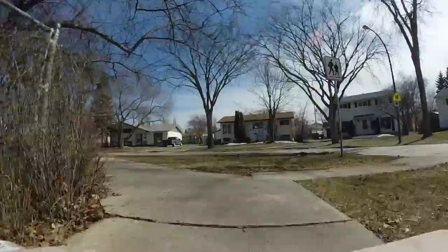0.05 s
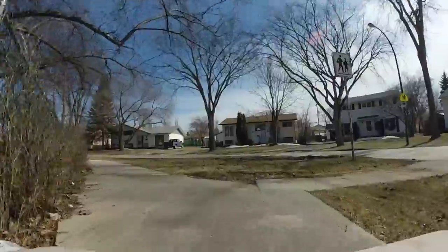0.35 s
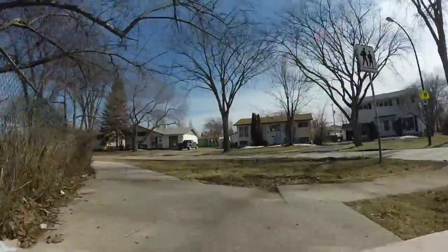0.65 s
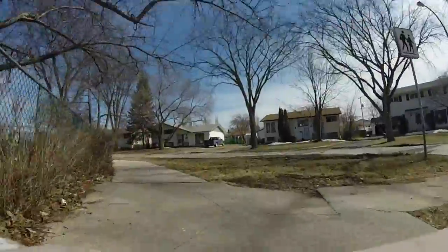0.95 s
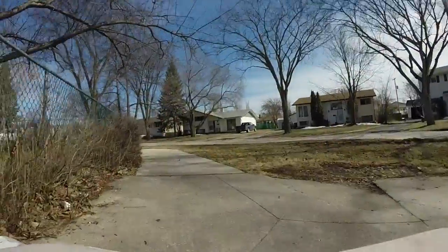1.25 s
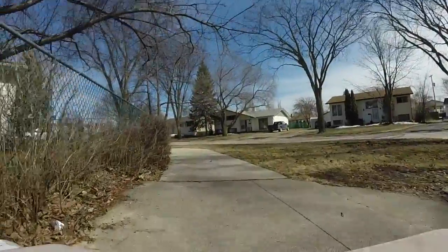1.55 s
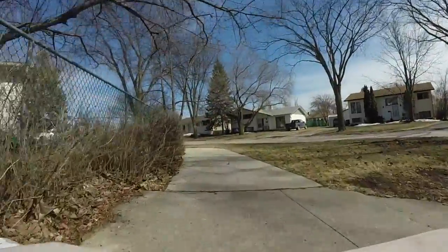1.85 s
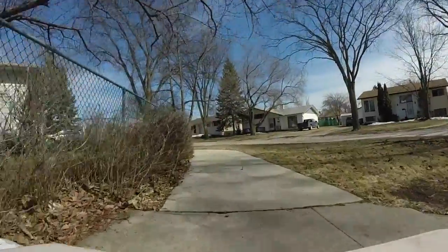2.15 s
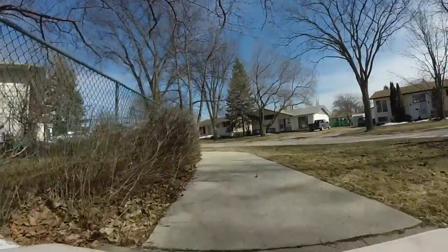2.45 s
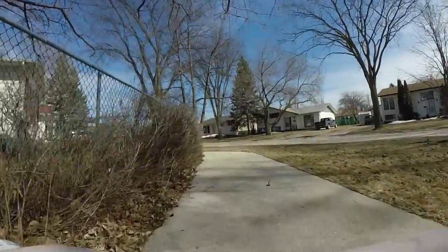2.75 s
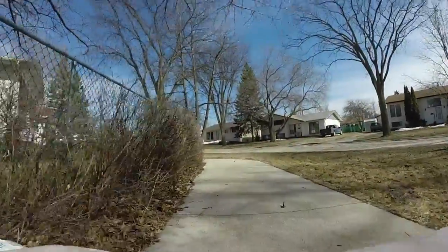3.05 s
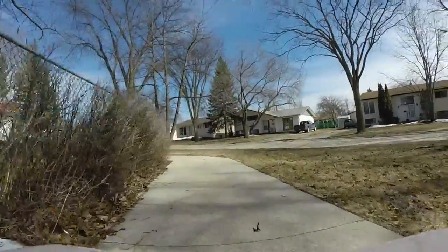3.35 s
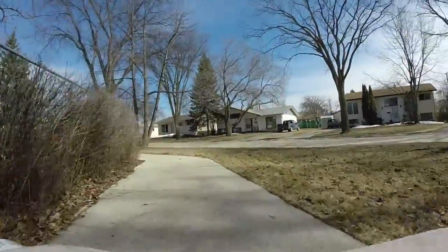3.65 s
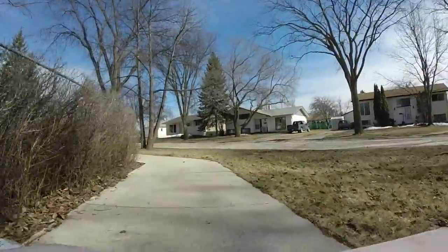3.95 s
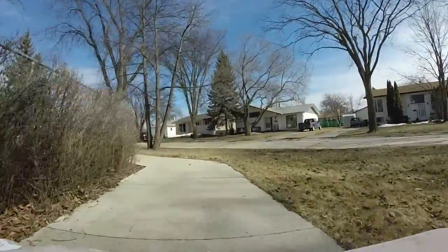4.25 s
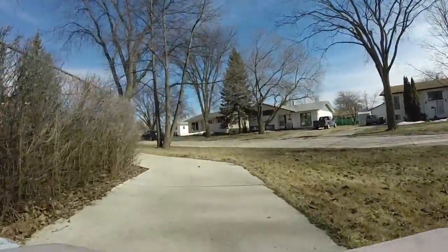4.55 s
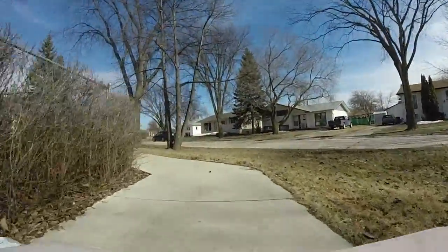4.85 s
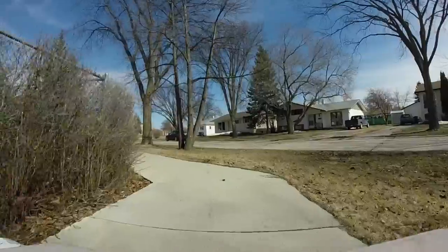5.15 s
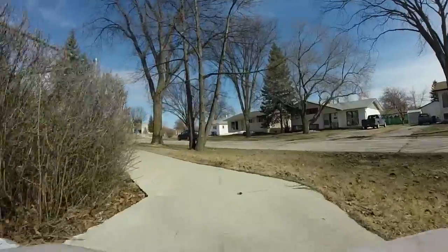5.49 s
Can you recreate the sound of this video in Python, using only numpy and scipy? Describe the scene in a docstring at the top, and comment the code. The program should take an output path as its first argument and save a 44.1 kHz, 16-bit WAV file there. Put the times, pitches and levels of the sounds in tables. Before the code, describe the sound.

A ride-on toy car rolls along concrete, its hard plastic wheels clattering and hollow body rumbling, with wind buffeting the microphone.

```python
"""Toy car on a sidewalk

A battery ride-on toy car rolls over rough concrete, heard from a small camera fixed to its body.
Its hard wheels make loose plastic parts clatter and the hollow shell boom, a little more once a turn.
After a bump the car goes light and the rattle eases. Sand hisses and grit crackles under the treads,
the axle rings faintly, the gears whine and wind buffets the microphone."""
import sys
import numpy as np
from scipy import signal
from scipy.fft import rfft, irfft, next_fast_len
from scipy.io import wavfile
from scipy.ndimage import uniform_filter1d

SR = 44100
rng = np.random.default_rng(int(sys.argv[2]) if len(sys.argv) > 2 else 0)


def wav_out(sig):
    """Save sig, one row per channel (or a flat mono array), as 16-bit PCM at SR to the path in sys.argv[1]."""
    wavfile.write(sys.argv[1], SR, np.round(np.clip(np.atleast_2d(sig).T, -1, 1) * 32767).astype(np.int16))


N = 243431
TIME = np.arange(N) / SR

# Loud knocks of loose plastic parts. Each row: start in seconds, level of the clack in dB,
# then its low thud and its bright edge, both in dB compared with the clack.
LOUD_KNOCKS = [(0.019, -12.5, -2.5, -15.5), (0.0316, -22, 3.5, -14.5), (0.043, -17.5, -4.5, -26),
               (0.07, -20, -7, -19), (0.099, -23, -2, -16), (0.1223, -25.5, -1, -10),
               (0.148, -23.5, 1, -10), (0.1706, -24.5, -3, -12.5), (0.21, -29.5, 1, -19.5),
               (0.2322, -25.5, -6, -15), (0.2544, -22.5, -11, -26), (0.2732, -28.5, -12.5, -20.5),
               (0.3131, -29.5, 4, -20), (0.361, -31, 3.5, -20), (0.394, -26, 3, -26),
               (0.436, -21, -3.5, -16.5), (0.4599, -26.5, -8.5, -25), (0.636, -19, -9, -15.5),
               (0.6565, -27, 1, -20), (0.669, -25, -3, -14), (0.7234, -24, 2, -6.5),
               (0.8111, -25.5, -4, -18.5), (0.838, -21.5, -20, -15), (0.8629, -24.5, 0, -24),
               (0.93, -21, -2.5, -4.5), (0.9386, -22, -7, -5), (0.9439, -19, -1, -6),
               (0.9835, -25.5, 6, -17), (1.0097, -27, -8.5, -5), (1.0449, -26.5, -0.5, -2.5),
               (1.0539, -19.5, -8, -21.5), (1.0582, -15, -3.5, -10.5), (1.086, -25.5, 3.5, -8),
               (1.12, -31.5, -6, -30), (1.151, -29, -14.5, -30), (1.2301, -20, -8.5, -19),
               (1.2423, -20.5, -8.5, -36), (1.283, -27, -12, -31), (1.3243, -22.5, -6.5, -17),
               (1.3776, -15, -11, -10.5), (1.4604, -20.5, -11, -11.5), (1.4985, -31.5, -5, -9.5),
               (1.539, -31.5, 0, -9), (1.599, -22, -15, -12), (1.637, -26.5, -11, -10),
               (1.6505, -17, -2, -11.5), (1.6651, -15.5, -3, -13.5), (1.714, -27.5, 2, -21.5),
               (1.7273, -18, -0.5, -17), (1.7553, -23.5, -2, -17.5), (1.7917, -25.5, 4, -15.5),
               (1.804, -22.5, -2.5, -25), (1.832, -24, -3, -27), (1.8959, -23.5, 1, -25),
               (1.924, -20.5, -3, -13.5), (1.939, -23, -4.5, -21), (1.974, -22.5, -1, -16.5),
               (1.9875, -20.5, -6, -18.5), (2.0104, -19.5, -1, -11), (2.0367, -20.5, -6, -18),
               (2.056, -17.5, 0, -14), (2.0787, -19.5, -1, -10.5), (2.0971, -22.5, -7, -12.5),
               (2.1809, -17.5, -16, -14.5), (2.239, -28, -5.5, -20.5), (2.2489, -26.5, 1, -25),
               (2.2719, -19.5, -2, -18), (2.312, -20.5, -5, -14.5), (2.389, -23.5, 1.5, -30),
               (2.411, -22, -1.5, -26.5), (2.444, -23.5, 0, -15.5), (2.504, -23.5, -2.5, -21.5),
               (2.521, -24.5, -2.5, -14), (2.576, -28, -3, -12), (2.59, -15.5, -4.5, -19),
               (2.6546, -26, -4, -10.5), (2.67, -25, -13.5, 0), (2.7137, -14.5, -7.5, -11),
               (2.7457, -22.5, 2.5, -9.5), (2.781, -19.5, -8, -19.5), (2.849, -26.5, -3, -29),
               (2.8859, -23, -3.5, -27), (2.8962, -24, -2.5, -10), (2.9149, -27, -1.5, -23.5),
               (2.945, -27, -2.5, -23), (3.0528, -24.5, -2, -15), (3.08, -24, -4, -31),
               (3.1035, -17, 0.5, -11), (3.1817, -25.5, 1, -14.5), (3.2033, -23, -2, -9),
               (3.2267, -26, -3.5, -12), (3.3538, -27, -10, -17), (3.3831, -21, 0, -23.5),
               (3.4096, -26.5, 6, -15), (3.497, -26, 3, -12.5), (3.523, -27.5, 5, -24),
               (3.5486, -31, -2, -7), (3.5594, -20, -2.5, -22), (3.5866, -15.5, -2.5, -8),
               (3.641, -29, -10, -14.5), (3.6468, -28.5, -1, -16), (3.6815, -27, 0.5, -12),
               (3.697, -30, -0.5, -13), (3.8194, -22.5, -1, -18.5), (3.8403, -28, 0.5, -19.5),
               (3.874, -29.5, -2.5, -16), (3.9098, -23, -2, -18.5), (3.9219, -24, 0, -15.5),
               (3.96, -17.5, -4, -10.5), (3.973, -26.5, 3, -12), (3.9914, -25.5, -4.5, -16.5),
               (4.0823, -26, -4.5, -20), (4.1327, -24.5, 0, -15), (4.15, -26, 1, -28),
               (4.189, -24, -6.5, -15), (4.1999, -25, 1, -10.5), (4.2068, -23, -0.5, -9),
               (4.3144, -20.5, 2, -13.5), (4.354, -21, 1, -18), (4.376, -21.5, -0.5, -33),
               (4.3924, -23.5, 0.5, -16.5), (4.476, -26, -4.5, -16), (4.5307, -20.5, -3, -25),
               (4.5379, -16, -19, -13.5), (4.568, -20, 1.5, -14), (4.609, -19, -10, -16),
               (4.6149, -24, 2, -4.5), (4.684, -28, -1.5, -14.5), (4.7029, -17.5, -5, -18),
               (4.724, -27.5, 3, -26.5), (4.7556, -23, 1.5, -28), (4.8162, -26.5, -5, -29),
               (4.8428, -20.5, -7, -15.5), (4.899, -23, -3.5, -14), (4.9109, -23.5, 2, -24),
               (4.9396, -26, 5, -5.5), (4.985, -17.5, -4, -12.5), (5.0636, -23, -8, -15),
               (5.125, -26, -6.5, -21), (5.136, -17, -4, -10), (5.1663, -25.5, -7.5, -6.5),
               (5.1905, -19, -0.5, -14), (5.204, -22.5, -3.5, -10.5), (5.21, -21, 2.5, -10),
               (5.2638, -20, -2, -9), (5.34, -24, -2.5, -11.5), (5.349, -22, 2.5, -33),
               (5.4017, -22, -3, -17.5), (5.435, -25.5, -5, -21), (5.4424, -23, -3.5, -33),
               (5.4578, -23.5, -2, -28), (5.476, -19.5, -11.5, -14.5), (5.488, -17, 1, -24.5)]
# The tone of crunching grit. Each row: frequency in Hz, level in dB.
GRIT_TONE = [(1000, -3), (2700, 9.5), (7400, -10.5), (8500, -11), (11000, -10.5), (12500, -20.5),
             (14500, -37)]
# The tone of hissing sand. Each row: frequency in Hz, level in dB.
SAND_TONE = [(1000, -14), (2500, -4), (4000, -3), (5200, 0), (6700, 0), (7400, -9), (8500, -21),
             (11000, -25), (12000, -43), (14000, -65)]


def undb(db):
    """Turn decibels into a number to multiply by."""
    return 10 ** (np.asarray(db) / 20)


def unit(x):
    """Scale a signal to an average (rms) size of 1."""
    return x / np.sqrt(np.mean(x ** 2))


def colour(x, tone):
    """Filter a sound to follow a tone table of frequencies in Hz and levels in dB."""
    hz, db = np.transpose(tone)
    size = next_fast_len(len(x) + SR // 2)
    freq = np.maximum(np.arange(size // 2 + 1) * SR / size, 1)
    gain = undb(np.interp(np.log(freq), np.log(hz), db))
    # fold the filter in time so that it never rings ahead of a sound
    cepstrum = irfft(np.log(gain), size)
    cepstrum[1:size // 2] *= 2
    cepstrum[size // 2 + 1:] = 0
    return irfft(rfft(x, size) * np.exp(rfft(cepstrum)), size)[:len(x)]


def noise(tone):
    """Noise with the given tone and an average size of 1."""
    return unit(colour(rng.standard_normal(N), tone))


def steady(x, span_s):
    """Even out the slow swells of a noise."""
    power = np.abs(signal.hilbert(x)) ** 2 / 2
    return x / np.sqrt(uniform_filter1d(power, int(span_s * SR)) + 1e-9)


def wander(rate_hz):
    """A smooth random curve with an average size of 1."""
    step = int(SR / rate_hz)
    points = rng.standard_normal(N // step + 2)
    line = np.interp(np.arange(N) / step, np.arange(len(points)), points)
    return unit(uniform_filter1d(line, step))


def add(track, start_s, sound):
    """Mix a sound into the track at the given time."""
    i = int(np.clip(start_s * SR, 0, N - 1))
    track[i:i + len(sound)] += sound[:N - i]


def curves(table):
    """Join rows that begin with a time into one curve for each other column."""
    times, *columns = np.transpose(table)
    return [np.interp(TIME, times, column) for column in columns]


def wind(change_db):
    """Gusts of air buffet the microphone with a deep flutter."""
    # The tone of the wind. Each row: frequency in Hz, level in dB.
    wind_tone = [(10, -32.5), (22, -17.5), (36, -0.5), (48, -4), (60, -9.5), (80, -16), (160, -31),
                 (300, -44.5), (800, -98)]
    # The strength of the wind. Each row: time in seconds, level in dB.
    gusts = [(0.0, -12), (0.24, -21), (0.36, -13), (0.96, -15), (1.08, -23), (1.32, -15), (3.12, -13),
             (3.24, -21), (3.6, -17.5), (3.84, -22), (4.08, -14), (5.04, -14), (5.28, -19), (5.52, -11.5)]
    gust_db, = curves(gusts)
    return steady(noise(wind_tone), span_s=0.1) * undb(gust_db + change_db - 1)


def gears(whine_hz=1640):
    """The motor's gears whine faintly; the uneven load makes pitch and level waver."""
    hz = whine_hz * (1 + 0.016 * wander(3.2) + 0.015 * wander(60))
    db = -62 + 4 * wander(30)
    return undb(db) * np.sin(2 * np.pi * np.cumsum(hz) / SR)


def sand(sand_db, shaking):
    """Patches of sand hiss under the treads, grain by grain, louder as the shaking presses down."""
    pressure = (.15 + steady(shaking, span_s=.3) ** 2) ** .35
    flicker_db, grain_db, patch_db = 2 * wander(130), 4 * wander(900), -0.5 * wander(12)
    swing_db = np.minimum(flicker_db + grain_db + patch_db, 9)
    return undb(sand_db - 3.5 + swing_db) * pressure * noise(SAND_TONE)


def grit(sand_db, shaking, tick_db=9, rasp_db=-5):
    """Grit crunches when the shaking presses the wheels down, and rasps with the sand in a skid."""
    # Wheels skidding on sand. Each row: start in seconds, length in seconds, level in dB.
    skids = [(0.05, 0.0066, -50), (0.157, 0.021, -55), (0.268, 0.016, -43.5), (0.512, 0.036, -56),
             (0.916, 0.013, -42), (1.395, 0.019, -48.5), (1.475, 0.0087, -52), (1.958, 0.036, -48.5),
             (2.06, 0.047, -58), (2.14, 0.03, -47), (2.528, 0.051, -53.5), (2.668, 0.027, -53),
             (2.907, 0.067, -54.5), (3.972, 0.01, -45.5), (4.281, 0.029, -52), (4.436, 0.0074, -53),
             (4.951, 0.021, -46.5), (5.412, 0.046, -50.5)]
    ticks, sliding = np.zeros(N), np.zeros(N)
    swing = np.abs(steady(shaking, span_s=0.29))
    peaks = signal.find_peaks(swing, height=1.5, distance=SR // 120)[0]
    tick = np.hanning(SR // 300) ** 2
    scatter_db = np.minimum(5.5 * rng.standard_normal(N // 100), 5)
    for i, db in zip(peaks, scatter_db):
        add(ticks, TIME[i], undb(sand_db[i] + tick_db + db) * swing[i] * tick)
    for start_s, length_s, db in skids:
        add(sliding, start_s, undb(db) * np.sqrt(np.hanning(int(length_s * SR))))
    sliding *= undb(-2 + 4.5 * wander(500))  # makes the skids grainy
    return (ticks + sliding) * noise(GRIT_TONE) + undb(rasp_db) * sliding * noise(SAND_TONE)


def axle(clatter, ring_hz=1870, fade_s=.17, stir_db=-8):
    """The clatter stirs the steel axle faintly; a direct blow makes it ring."""
    # Hard blows that reach the axle. Each row: start in seconds, level in dB.
    axle_hits = [(0.946, -36), (1.058, -30.5), (1.378, -39), (2.713, -38), (3.585, -36.5), (4.539, -32.5),
                 (4.615, -34.5), (5.192, -32.5)]
    pole = np.exp((2j * np.pi * ring_hz - np.log(1000) / fade_s) / SR)  # one fading note, as a filter
    push = 2 * undb(stir_db) * (1 - abs(pole)) * clatter
    for start_s, db in axle_hits:
        add(push, start_s, undb([db]))
    return -signal.lfilter([1], [1, -pole], push).imag


def shell(boom_db, rumble_db, clatter):
    """The hollow shell booms and its panels rumble; both swell with each knock."""
    # The tone of the shell's boom. Each row: frequency in Hz, level in dB.
    boom_tone = [(40, -28.5), (62, -4), (82, 5), (97, 1.5), (112, -11.5), (160, -21.5), (500, -82)]
    # The tone of the panels' rumble. Each row: frequency in Hz, level in dB.
    rumble_tone = [(60, -22), (115, 2), (180, 1), (240, -4.5), (320, -9.5), (420, -18.5), (650, -20.5),
                   (1000, -33.5), (3000, -111.5)]
    power_now = uniform_filter1d(clatter ** 2, int(.012 * SR)) + 1e-9
    power_usual = uniform_filter1d(clatter ** 2, int(.4 * SR)) + 1e-9
    swell = (power_now / power_usual) ** 0.24
    boom = steady(noise(boom_tone), span_s=0.079) * swell ** 0.3
    rumble_level = undb(rumble_db - 0.5)
    boom_level = undb(boom_db - 1.16 + 1.64 * wander(35))
    rumble = steady(noise(rumble_tone), span_s=0.076) * swell
    return boom * boom_level + rumble * rumble_level


def jolts(thump_hz=190, tick_db=-37, tick_s=0.00039):
    """A bump thumps the shell and makes the camera mount tick."""
    # Bumps that shake the shell. Each row: time in seconds, level in dB, seconds to fade by 60 dB.
    bumps = [(.16, -5, 0.043), (0.726, -10, 0.019), (0.895, -8.5, 0.077), (0.923, -6, 0.033),
             (0.947, -11, 0.03), (1.397, 1, 0.012), (1.652, -8, 0.045), (2.073, -9, 0.016),
             (2.241, -13, 0.064), (2.267, -6.5, 0.083), (2.421, -9.5, 0.038), (2.7211, -4, 0.015),
             (3.1048, 3.5, 0.014), (3.413, -4.5, 0.034), (3.552, -2, 0.026), (3.5882, -6, 0.035),
             (4.193, -8.5, 0.036), (4.364, -7.5, 0.044), (4.536, -9, 0.041), (4.946, -11, 0.018),
             (4.9862, -1, 0.016), (5.269, -7, 0.013)]
    t = TIME[:SR // 10]
    thumps, ticks = np.zeros(N), np.zeros(N)
    pitches = thump_hz * np.exp(0.093 * rng.standard_normal(len(bumps)))
    rise = 1 - np.exp(-t / 0.0011)
    for (start_s, db, fade_s), hz in zip(bumps, pitches):
        ring = np.sin(2 * np.pi * hz * t) * np.exp(-np.log(1000) * t / fade_s)
        add(thumps, start_s - .002, undb(db) * ring * rise)
        add(ticks, start_s, undb(db) * np.exp(-t / tick_s))
    return thumps + undb(tick_db) * ticks * noise(GRIT_TONE)


def snaps(ring_hz=2520, fade_s=0.016):
    """A small stiff plastic part slaps against its stop and rings high and briefly."""
    # Slaps of the stiff part. Each row: start in seconds, level in dB.
    slaps = [(0.938, -21), (1.042, -20), (3.584, -10)]
    t = TIME[:SR // 20]
    ring = np.sin(2 * np.pi * ring_hz * t) * np.exp(-np.log(1000) * t / fade_s)
    rise = 1 - np.exp(-(t / .0007) ** 2)
    track = np.zeros(N)
    for start_s, db in slaps:
        add(track, start_s, undb(db) * rise * ring)
    return track


def wheel_load(turn_hz=4.4, first_press_s=0.062, swell_db=0.5, ramp_s=0.024):
    """Level changes in dB: an out-of-round wheel presses once a turn; the car goes light after bumps."""
    # Moments when the car goes light. Each row: start in seconds, length in seconds,
    # then the change in dB of the rattle, of the low shaking and of the sand.
    lulls = [(1.094, 0.084, -4.5, -3.5, 5.5), (1.417, 0.024, -15, -5, 6), (1.509, 0.052, -8, -11, 7),
             (2.115, 0.037, -18.5, -2, 1), (2.287, 0.023, -14, -22, -2), (2.763, 0.018, -25.5, -7.5, 1.5),
             (3.123, 0.043, -13.5, -19.5, -16), (3.239, 0.031, -8, -1, -10),
             (3.607, 0.18, -11.5, -5.5, 2.5), (5.017, 0.065, -2.5, -8.5, -6)]
    db = swell_db * np.cos(2 * np.pi * turn_hz * (TIME - first_press_s))
    for start_s, length_s, *change_db in lulls:
        inside_s = np.minimum(TIME - start_s, start_s + length_s - TIME)
        db = db + np.outer(change_db, np.clip(.5 + inside_s / ramp_s, 0, 1))
    return db


def chatter(blows, touch_db, rebound_db, skip_db):
    """A loose part grazes just before it lands, then bounces twice at uneven gaps."""
    early_s, first_s, second_s = rng.uniform([.001, .002, .0015], [.003, .0048, .005], (len(blows), 3)).T
    contacts = [blows]
    for lag_s, db in (-early_s, touch_db), (first_s, rebound_db), (first_s + second_s, skip_db):
        softer = blows.copy()
        softer[:, 0] += lag_s
        softer[:, 1] += db
        contacts.append(softer)
    return np.vstack(contacts)


def strike(blows, rise_s, scrape_db, scrape_fade_s, detune):
    """Blows (rows as in LOUD_KNOCKS) ring the body; each lands elsewhere, so its notes mix anew."""
    # The notes of the plastic body. Each row: frequency in Hz, level in dB, seconds to fade by 60 dB.
    body_notes = [(337.4, -2.5, 0.045), (437, -4.5, 0.028), (506.3, -0.5, 0.029), (655, -1, 0.032),
                  (783, -5.5, 0.032), (1072, -2, 0.028), (1262, -2.5, 0.031), (1456, 1, 0.023),
                  (1638, 5, 0.034), (1784, 4, 0.025), (1975, -5.5, 0.023), (2144, 0.5, 0.026),
                  (2261, -7.5, 0.057), (2418, -6.5, 0.012), (2600, -15, 0.02), (2857, -17, 0.02),
                  (3236, -23.5, 0.02), (3816, -20, 0.015), (4055, -18, 0.014), (4510, -24, 0.013)]
    # The tone of plastic scraping. Each row: frequency in Hz, level in dB.
    scrape_tone = [(500, -15.5), (1000, -3.5), (2000, 13), (2950, -17.5), (3400, -5.5), (4400, -14),
                   (5400, -16.5), (7000, -25.5), (9000, -32), (11500, -38.5), (15000, -51.5)]
    t = TIME[:SR // 16]
    hz, db, fade_s = np.transpose(body_notes)
    rise = 1 - np.exp(-(t / rise_s) ** 2)
    notes = undb(db)[:, None] * rise * np.exp(np.outer(2j * np.pi * hz - np.log(1000) / fade_s, t))
    starts, clack_db, thud_db, edge_db = np.transpose(blows)
    weights = rng.standard_normal((len(starts), len(hz), 2)) @ [1, 1j]  # size and phase of each note
    weights /= np.sqrt(np.abs(weights))
    # the big panels behind the low notes flex most, so their pitch varies most
    bands = [(hz < 900, clack_db + thud_db, 2 * detune),
             ((hz >= 900) & (hz < 3000), clack_db, detune),
             (hz >= 2400, clack_db + edge_db, detune)]
    ringing, scraping = np.zeros(N), np.zeros(N)
    for in_band, band_db, spread in bands:
        rings = (weights[:, in_band] @ notes[in_band]).real
        opening_size = rings[:, :SR // 180].std(axis=1)
        rings = rings * (undb(band_db) / opening_size)[:, None]
        speeds = 1 + spread * rng.standard_normal(len(starts))
        for start_s, ring, speed in zip(starts, rings, speeds):
            add(ringing, start_s, np.interp(t * speed, t, ring))
    # the surfaces scrape briefly as they meet
    scrape = rise * np.exp(-np.log(1000) * t / scrape_fade_s)
    for start_s, size_db in zip(starts, clack_db + edge_db):
        add(scraping, start_s, undb(size_db) * scrape)
    return ringing + undb(scrape_db) * colour(scraping * rng.standard_normal(N), scrape_tone)


def rattle(rattle_db, count=440, airborne_s=0.014, airborne_db=-12):
    """Rough concrete keeps the loose parts rattling with small blows at uneven gaps."""
    timing, force, thud, edge = rng.standard_normal((count, 4)).T
    starts = (np.arange(count) + .4 * timing) * TIME[-1] / count
    clack_db = np.minimum(np.interp(starts, TIME, rattle_db) - 0.78 + 2 * force, -38)
    # just before a loud knock the loose parts are in the air and touch little
    until_knock_s = np.array(LOUD_KNOCKS)[:, 0] - starts[:, None]
    airborne = ((until_knock_s > -.002) & (until_knock_s < airborne_s)).any(axis=1)
    blows = np.transpose([starts, clack_db + airborne_db * airborne, 5 + 3.5 * thud, -12 + 3 * edge])
    contacts = chatter(blows, touch_db=-11, rebound_db=-7.5, skip_db=-8.5)
    return strike(contacts, rise_s=0.0015, scrape_db=13, scrape_fade_s=0.028, detune=0.023)


def knocks(lead_s=.0007, clack_db=-8.5, thud_db=5.5, edge_db=1, edge_limit_db=-28.5):
    """Wheels, axles and panels sit loosely and knock loudly against the body."""
    blows = np.array(LOUD_KNOCKS) + [-lead_s, clack_db, thud_db, edge_db]
    # the bright edge of the loudest knocks is capped, keeping them a dull clack
    blows[:, 3] = np.minimum(blows[:, 3], edge_limit_db - blows[:, 1])
    contacts = chatter(blows, touch_db=-21.5, rebound_db=-14, skip_db=-17.5)
    return strike(contacts, rise_s=0.00091, scrape_db=20, scrape_fade_s=0.014, detune=0.015)


def scene():
    """The car and the wind in one channel, close by and in the open air."""
    # Levels set by the changing pavement. Each row: time in seconds,
    # then the levels in dB of shell boom, panel rumble, small rattle and sand.
    pavement = [(0.0, -19, -18.5, -16.5, -58.5), (0.48, -15.5, -26, -44.5, -61),
                (0.84, -20.5, -20, -42.5, -67), (1.08, -12.5, -22.5, -50, -75.5),
                (1.2, -25, -23, -43, -62.5), (1.44, -12.5, -22.5, -44, -75), (1.68, -24, -21.5, -32, -63),
                (1.92, -25, -23, -25, -69.5), (2.04, -14, -17.5, -29, -62.5),
                (2.28, -17.5, -23.5, -39, -64), (3.0, -16, -21.5, -43.5, -63.5),
                (3.48, -24.5, -27.5, -43, -67.5), (3.6, -26, -18.5, -56, -74),
                (3.72, -14.5, -25.5, -40.5, -75), (3.85, -16.5, -25.5, -43, -70.5),
                (3.96, -14.5, -24.5, -42, -70), (4.08, -24, -28, -46, -64), (4.2, -14, -24.5, -41.5, -66),
                (5.52, -19.5, -18.5, -41.5, -64.5)]
    boom_db, rumble_db, rattle_db, sand_db = curves(pavement)
    rattle_change_db, shake_change_db, sand_change_db = wheel_load()
    clatter = knocks() + snaps() + rattle(rattle_db + rattle_change_db)
    shaking = wind(0.52 * shake_change_db)
    shaking += shell(boom_db + shake_change_db, rumble_db + 0.51 * shake_change_db, clatter)
    treads = sand(sand_db + sand_change_db, shaking) + grit(sand_db + sand_change_db, shaking)
    return (clatter + axle(clatter) + jolts() + gears() + shaking + treads)[None]


def record(dry):
    """The camera flattens peaks beyond full scale and cuts the treble above 13500 Hz."""
    treble_cut = signal.ellip(8, .2, 70, 13500, fs=SR, output="sos")
    return signal.sosfilt(treble_cut, np.clip(dry, -1, 1))


dry = scene()
out = record(dry)
wav_out(out)
```